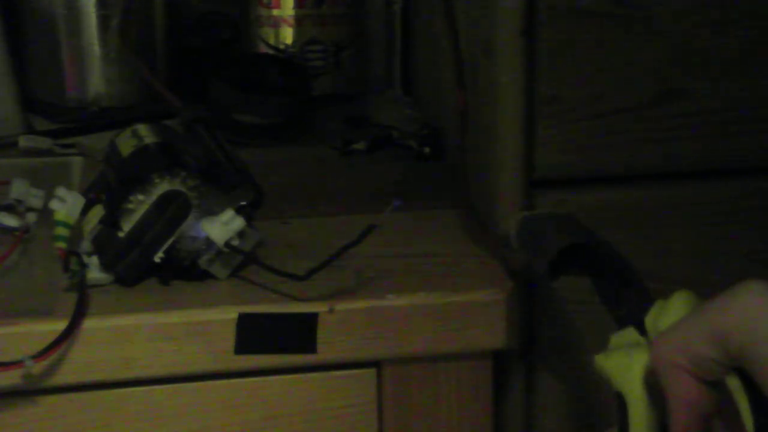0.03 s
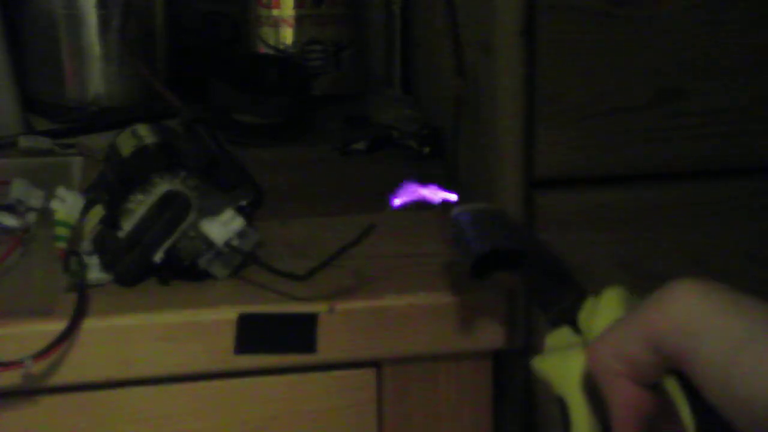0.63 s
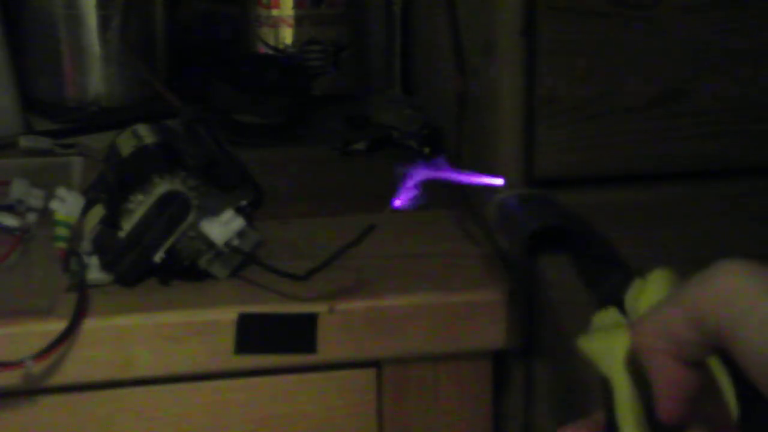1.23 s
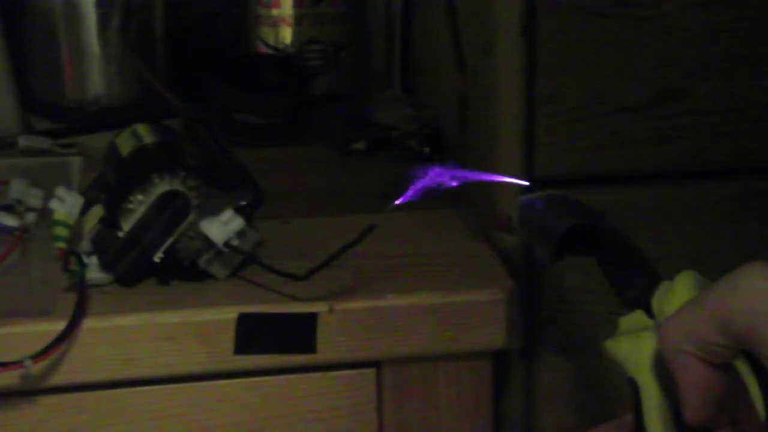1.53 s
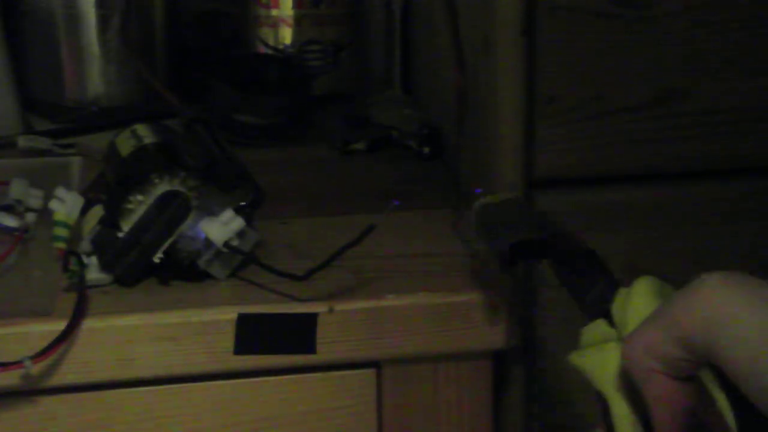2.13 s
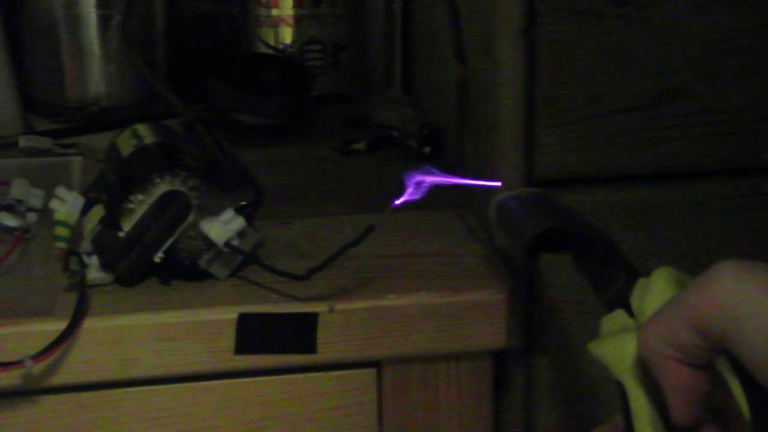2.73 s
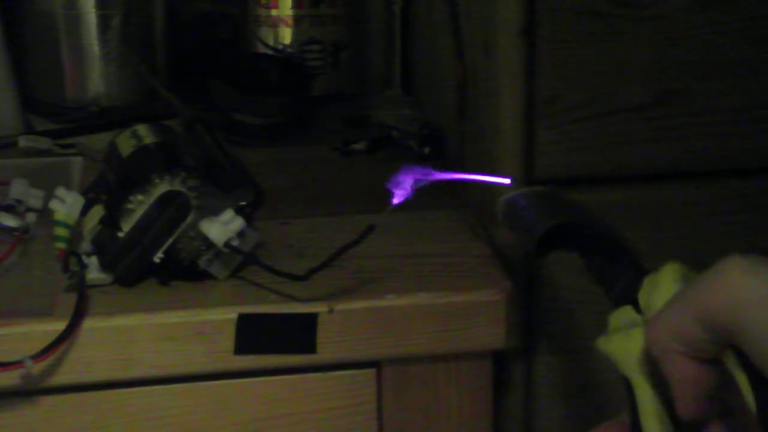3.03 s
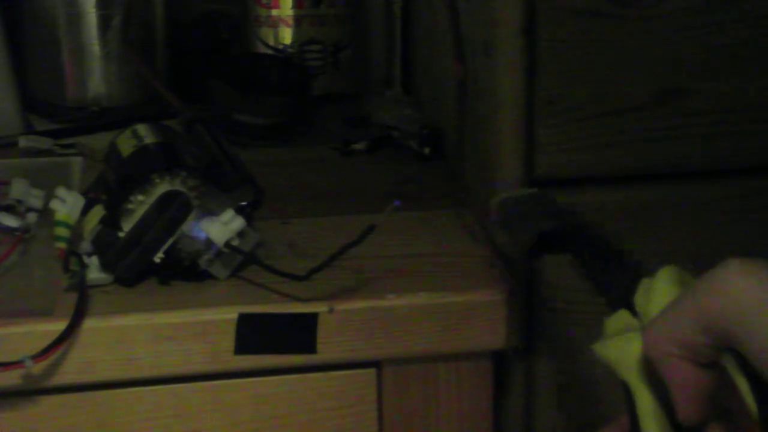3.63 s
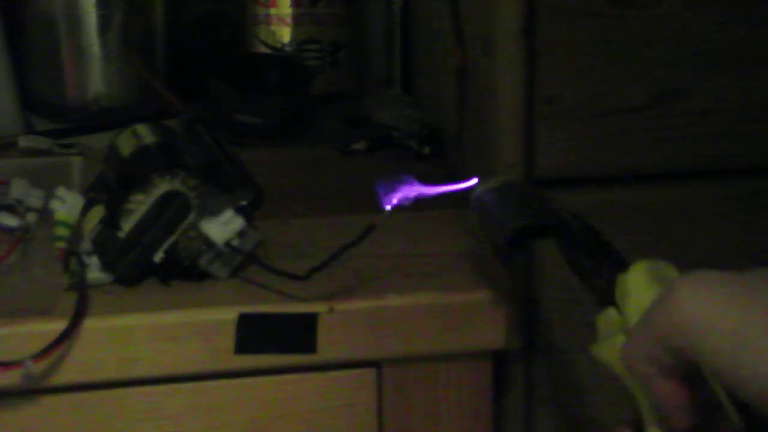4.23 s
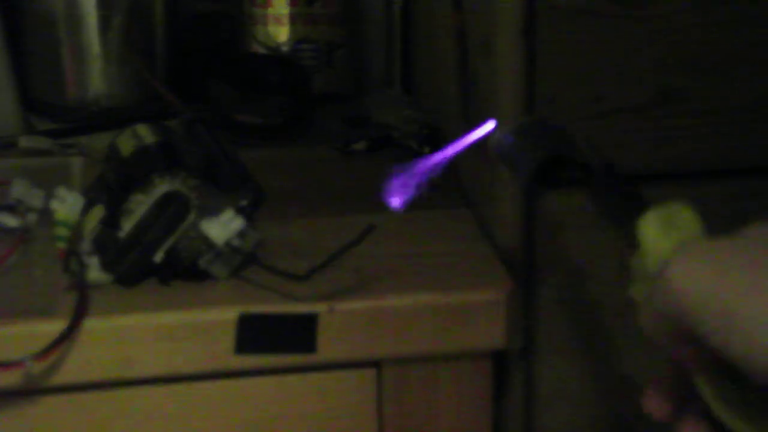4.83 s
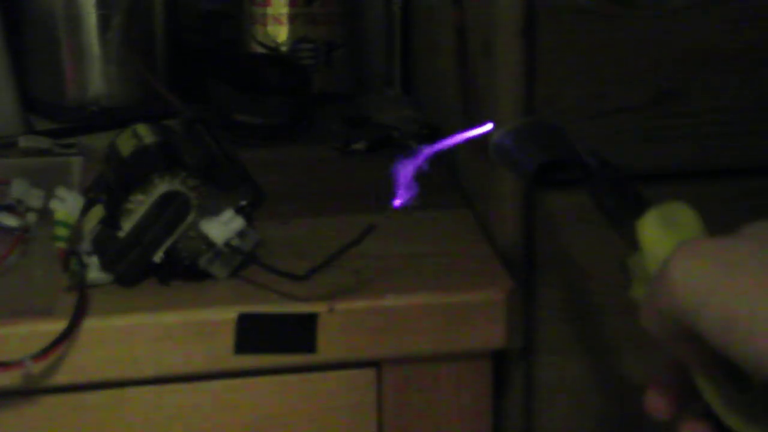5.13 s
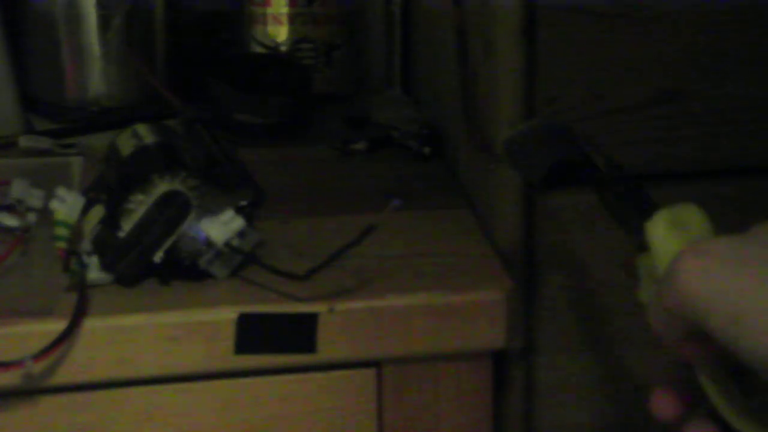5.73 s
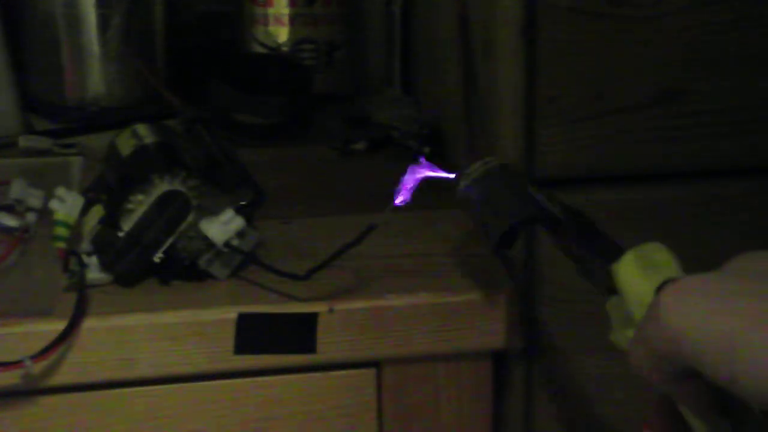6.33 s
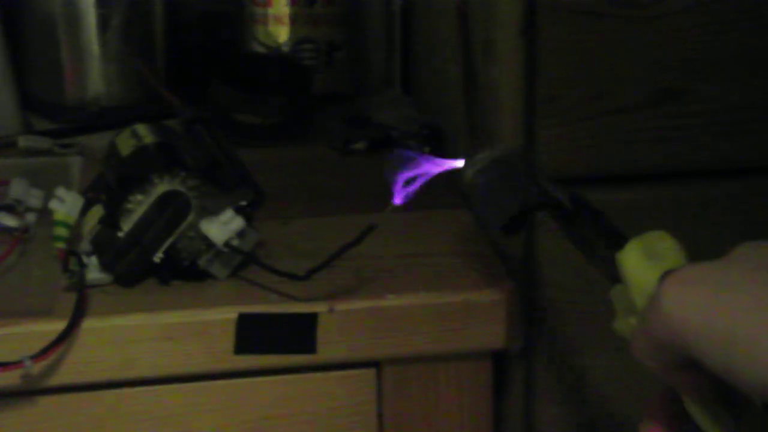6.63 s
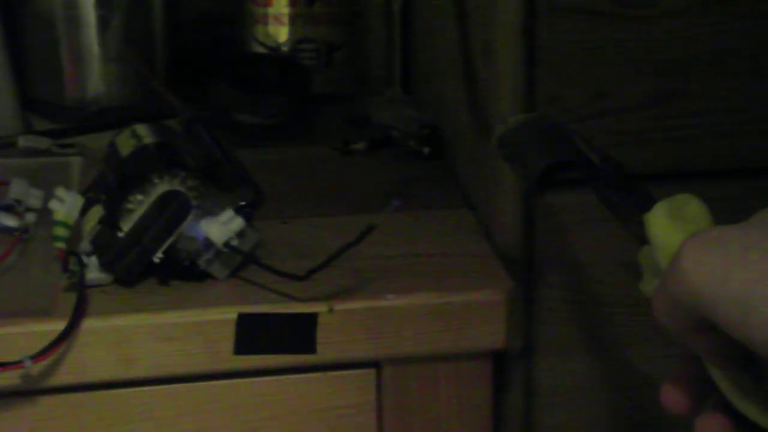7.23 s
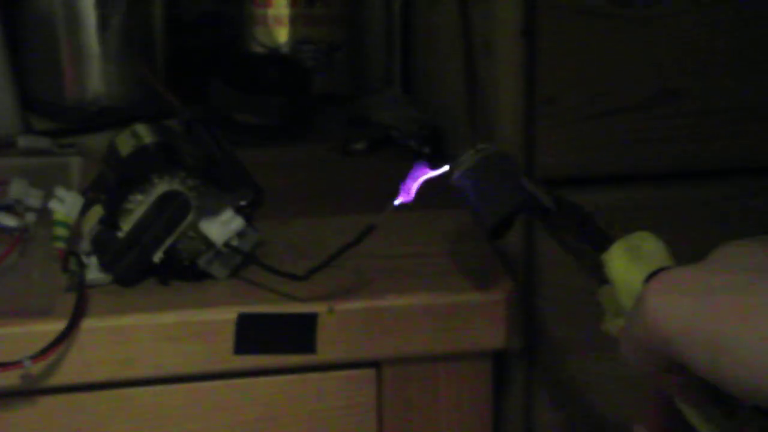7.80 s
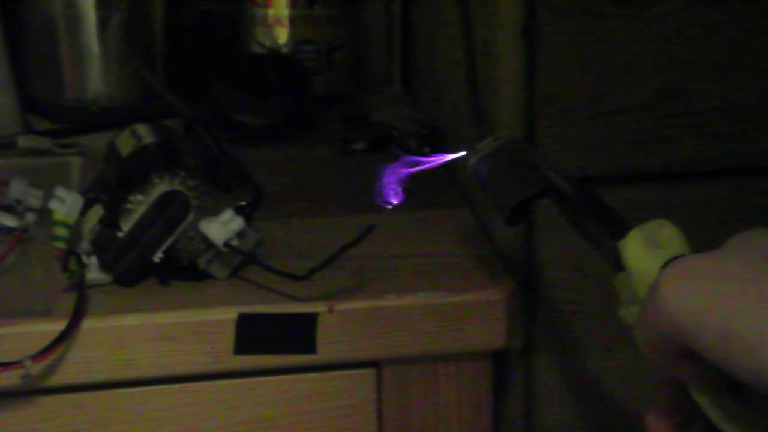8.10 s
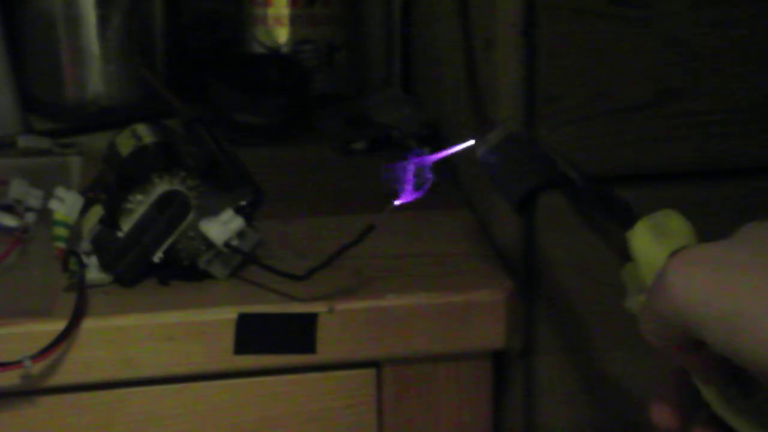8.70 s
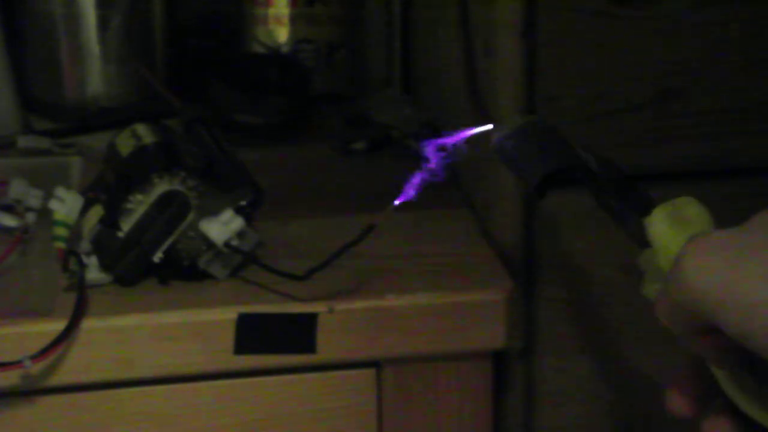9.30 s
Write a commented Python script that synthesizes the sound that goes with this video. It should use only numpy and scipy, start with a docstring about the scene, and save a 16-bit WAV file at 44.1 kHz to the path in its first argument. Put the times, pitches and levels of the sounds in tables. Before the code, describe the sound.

A transformer rattles with sharp snaps between electric arcs that pop, sizzle, whistle and sputter, while a cooling fan runs in a small workshop.

```python
"""A high-voltage transformer flashes over in rattles of sharp snaps while no arc burns.
Five times an arc is drawn from its lead: it catches with a pop, sizzles softly, then hisses,
whistles and sputters as it is stretched, and breaks. The driver whines, a cooling fan rushes,
and a low rumble with dull bumps runs underneath. A small wooden room answers the sparks."""
import sys
import numpy as np
from scipy import signal
from scipy.fft import rfft, irfft, next_fast_len
from scipy.io import wavfile

SR = 44100
rng = np.random.default_rng(int(sys.argv[2]) if len(sys.argv) > 2 else 0)


def dump(signal):
    """Clip the signal to [-1, 1] and save it as 16-bit WAV at the path in sys.argv[1]."""
    limited = np.clip(np.atleast_2d(signal).T, -1, 1)
    pcm = np.round(limited * 32767).astype(np.int16)
    wavfile.write(sys.argv[1], SR, pcm)


N = 412776
TIME_S = np.arange(N) / SR


# flashover spectrum: freq_hz, level_db
SNAP_SPECTRUM = [(300, -48), (1500, -35.5), (2500, -15.5), (2850, -9), (3080, 1), (3450, -8.5), (4000, -17),
                 (4700, -22.5), (5400, -14.5), (6600, -5), (7400, -5.5), (8300, 3), (9600, -3.5),
                 (11200, -24), (13500, -25), (15300, -17)]

def flashovers():
    """Each flashover is a pressure spike with a brief metallic ring, then a rough scatter."""
    start_s = flashover_times()
    gains = amp(-.2 + .5 * rng.standard_normal(len(start_s)))
    spikes = strikes(start_s, gains, click(SNAP_SPECTRUM))
    scatter = strikes(start_s, gains, decay(t60_s=.016, samples=SR // 25)) * noise(SNAP_SPECTRUM)
    return spikes + amp(-22) * scatter


# runs of flashovers: first_s, last_s, rate_hz
RATTLE_RUNS = [(0.008, 0.025, 59), (0.075, 0.14, 49), (0.18, 0.24, 38), (0.281, 0.337, 53),
               (0.379, 0.379, 59), (1.609, 2.129, 60), (3.395, 3.64, 65), (3.67, 3.888, 50),
               (5.523, 5.93, 57), (5.941, 6.15, 54), (7.085, 7.58, 58)]

def flashover_times(recharge_scatter=.17):
    """The voltage builds up and flashes over repeatedly, after slightly uneven waits."""
    jitters = rng.standard_normal((len(RATTLE_RUNS), 64))
    runs = []
    for (first_s, last_s, rate_hz), jitter in zip(RATTLE_RUNS, jitters):
        span_s = last_s - first_s
        count = max(round(span_s * rate_hz), 1)
        waits = np.exp(recharge_scatter * jitter[:count])
        runs.append(first_s + span_s * np.append(0, np.cumsum(waits)) / waits.sum())
    return np.concatenate(runs)


# short-arc burns: start_s, end_s, pop_db, sizzle_db
ARC_BURNS = [(0.413, 1.205, -35, -46), (2.128, 2.65, -31, -50), (3.901, 4.565, -29, -50.5),
             (6.19, 6.82, -30.5, -44.5), (7.596, 8.904, -31, -45)]
# short-arc spectrum: freq_hz, level_db
SIZZLE_SPECTRUM = [(1000, -10), (5000, -23), (6700, 7), (8200, 14), (9500, -9), (11500, -14), (15500, -11)]

def soft_arc(swell_db=7, swell_s=.092):
    """A short arc sizzles, ticks and crackles, swelling just before it starts to hiss."""
    level = np.zeros(N)
    for start_s, end_s, _, sizzle_db in ARC_BURNS:
        swell = np.exp(-np.abs(end_s - TIME_S) / swell_s)
        level += gate(start_s, end_s, edge_s=.0092) * amp(sizzle_db + swell_db * swell)
    sizzle = unit(flutter(depth_db=3.9, rate_hz=60) * noise(SIZZLE_SPECTRUM, grain_db=8))
    ticks = sputter(SPIT_SPECTRUM, rate_hz=69, rise_s=.00064, spread_db=11)
    crackles = sputter(FLARE_SPECTRUM, rate_hz=11, rise_s=.00084, spread_db=13)
    wander = amp(1.5 * wobble(7.9))
    return level * wander * (amp(-1) * sizzle + amp(-1.5) * (ticks + crackles))


# ignition spectrum: freq_hz, level_db
POP_SPECTRUM = [(200, -3), (600, 1), (1200, 4), (2600, 1), (4500, -2), (9000, -12)]

def pops():
    """The arc catches with a short, full-bodied pop."""
    start_s, _, pop_db, _ = np.transpose(ARC_BURNS)
    return strikes(start_s, amp(pop_db), decay(t60_s=.076, samples=SR // 10)) * noise(POP_SPECTRUM)


# long-arc spells: start_s, end_s, hiss_db, whistle_db, whistle_rise_db, tone_share
ARC_STRETCHES = [(1.064, 1.08, -47, -34.5, -15, .2), (1.21, 1.495, -32.5, -25, 8, .8),
                 (2.65, 2.886, -32, -38, -2, 0.55), (2.884, 3.39, -31.5, -26.5, -2, .8),
                 (4.566, 5.47, -33.5, -29.5, -1, 0.51), (6.833, 7.093, -30.5, -31.5, -4, 0.2),
                 (8.914, 9.4, -32, -32, 2, 0.25)]
# long-arc spectrum: freq_hz, level_db
HISS_SPECTRUM = [(500, -42), (2000, -8.5), (2800, 1.5), (4000, -10), (5300, -29), (6700, -7), (8200, -4),
                 (10000, -1.5), (11500, -8), (14000, 3), (15500, 0)]
STRETCH_EDGE_S = .0054

def stretched_arc():
    """The long arc flutters, hisses and sputters."""
    level = sum(amp(hiss_db) * gate(start_s, end_s, STRETCH_EDGE_S)
                for start_s, end_s, hiss_db, *_ in ARC_STRETCHES)
    hiss = unit(flutter(depth_db=4.4, rate_hz=170) * noise(HISS_SPECTRUM, grain_db=3.5))
    spurts = sputter(SPIT_SPECTRUM, rate_hz=70, rise_s=.0016, spread_db=16)
    return level * (amp(1) * hiss + spurts)


def whistle(pitch_hz=13248, band_hz=13160, half_width_hz=330, ends_db=-4):
    """The long arc whistles, between a fuzzy band and a clean tone; unsteady, it stutters."""
    level, tone_share = np.zeros(N), np.zeros(N)
    for start_s, end_s, _, level_db, rise_db, share in ARC_STRETCHES:
        on = gate(start_s, end_s, STRETCH_EDGE_S)
        progress = np.interp(TIME_S, [start_s, end_s], [-1, 1])
        level += on * amp(level_db + rise_db * progress / 2 + ends_db * progress ** 2)
        tone_share += on * share
    tone_share = np.clip(tone_share, 0, 1)
    jitter_hz = (12 + 60 * (1 - tone_share)) * wobble(150)
    tone = np.sqrt(2) * np.sin(2 * np.pi * np.cumsum(pitch_hz + jitter_hz) / SR)
    fuzz = unit(filtered(rng.standard_normal(N), lambda hz: resonance(hz, band_hz, half_width_hz)))
    stutter = amp((1.2 + 3.8 * (1.5 - tone_share)) * wobble(110))
    voice = np.sqrt(tone_share) * tone * stutter + np.sqrt(1 - tone_share) * fuzz
    waver_db = 2 * wobble(14)
    return amp(4 + waver_db) * level * voice


# loudest spits: time_s, level_db, crack_offset_db
ARC_SPITS = [(2.8414, -11, -15), (3.0505, -12, -15), (3.0974, -11.5, -18), (3.2834, -13, -20),
             (3.2959, -7, -9.5), (4.7007, -0.5, -23), (4.7227, -5, -21), (4.7547, -1, -14.5),
             (4.7657, -7.5, -5.5), (4.804, -6.5, -17), (4.8443, -6.5, -20), (4.9343, -4, -8),
             (4.9457, -3, -11), (4.96, -9, -8), (5.019, -5.5, -9.5), (5.0348, -3.5, -10.5),
             (5.3797, -8, -12), (5.46, -11, -13), (6.984, -4.5, -22), (7.003, -8, -23), (7.0472, -5, -16),
             (9.3483, -4.5, -15)]
# bright crackle spectrum: freq_hz, level_db
SPIT_SPECTRUM = [(1000, -28), (5300, -28), (6800, -6.5), (8200, 3), (9200, 1), (10200, -1), (11500, -14.5),
                 (15500, -10.5)]
# lower crack spectrum: freq_hz, level_db
CRACK_SPECTRUM = [(500, -25), (1700, -14.5), (2400, 2.5), (3000, 0), (3700, -4), (4400, -16.5),
                  (5400, -18.5), (6600, -4), (9000, -29)]

def spits(rise_s=.0027, lead_s=.0016, catch_db=-17.5, catch_crack_db=-3):
    """The arc catches or its root jumps: milliseconds of dense crackle over a lower crack."""
    catches = [(start_s, catch_db, catch_crack_db) for start_s, *_ in ARC_BURNS]
    time_s, level_db, crack_offset_db = np.transpose(list(ARC_SPITS) + catches)
    start_s = time_s - lead_s
    puff = pulse(rise_s) ** 2
    bright = strikes(start_s, amp(level_db - 8), puff) * noise(SPIT_SPECTRUM, grain_db=3.5)
    crack_level = strikes(start_s, amp(level_db + crack_offset_db - 2), puff)
    return bright + crack_level * noise(CRACK_SPECTRUM, grain_db=2)


# flares as the arc tears off: start_s, length_s, level_db
ARC_FLARES = [(1.427, .009, -14), (1.454, .007, -12), (1.48, 0.043, -13), (1.526, 0.067, -13.3),
              (3.332, 0.014, -13.5), (3.369, .018, -12.5), (4.764, .008, -18), (7.052, .004, -16),
              (7.068, 0.014, -15)]
# flare spectrum: freq_hz, level_db
FLARE_SPECTRUM = [(300, -41), (1000, -20), (1900, -9), (2700, 3), (3400, -1.5), (4100, -12), (5000, -17.5),
                  (5700, -10.5), (6900, 5.5), (8200, 2), (10000, -4), (11500, -15), (15500, -10)]

def flares():
    """Close to breaking, the arc restrikes so fast that its cracks merge into a roar."""
    level = sum(amp(level_db) * gate(start_s, start_s + length_s, edge_s=.0017)
                for start_s, length_s, level_db in ARC_FLARES)
    restrikes = flutter(depth_db=2.3, rate_hz=450)
    return level * unit(restrikes * noise(FLARE_SPECTRUM, grain_db=4.5))


def sputter(spectrum, rate_hz, rise_s, spread_db):
    """Brief spurts of the arc at random moments; rms 1."""
    start_s = np.cumsum(rng.uniform(.15, 1.85, round(2 * rate_hz * N / SR))) / rate_hz
    start_s = start_s[start_s < N / SR]
    gains = amp(-spread_db * rng.random(len(start_s)))
    return unit(strikes(start_s, gains, pulse(rise_s)) * noise(spectrum, grain_db=6))


# driver tones: pitch_hz, rms_db
DRIVER_TONES = [(7440, -39), (14880, -38)]

def driver_whine():
    """The driver sings at one near-steady pitch and its octave."""
    phase_per_hz = 2 * np.pi * np.cumsum(1 + .00008 * wobble(5.7)) / SR
    waver = amp(.8 * wobble(6))
    return waver * sum(np.sqrt(2) * amp(db) * np.sin(hz * phase_per_hz) for hz, db in DRIVER_TONES)


# fan and housing resonances: centre_hz, half_width_hz, level_db
FAN_RESONANCES = [(1355, 145, -12.5), (1623, 65, -5), (2105, 104, 0), (2533, 162, -3), (2720, 336, -6),
                  (2976, 76, -8), (3284, 53, -11)]
# room air and broad fan rush: freq_hz, level_db
AIR_SPECTRUM = [(30, -11), (150, -10.5), (320, -3), (550, -9), (800, -2), (1200, -2.5), (3000, -8),
                (3800, -1), (4800, -8.5), (7000, -5), (9000, -10), (13500, -12), (15300, -2.5)]

def fan():
    """Air rushes through the fan's housing, over the broad hush of the room."""
    def housing(hz):
        return np.sqrt(sum((amp(level_db) * resonance(hz, centre_hz, half_width_hz)) ** 2
                           for centre_hz, half_width_hz, level_db in FAN_RESONANCES))
    rush = unit(filtered(rng.standard_normal(N), housing))
    return amp(-30.5) * rush + amp(-38) * noise(AIR_SPECTRUM)


# low background levels: time_s, rumble_db, rub_db
RUMBLE_LEVELS = [(0.0, -41, -48.5), (1.41, -45.5, -43), (1.82, -39.5, -45.5), (2.06, -42.5, -44.5),
                 (2.4, -39, -43.5), (2.74, -40.5, -47), (3.44, -42.5, -46.5), (4.48, -37, -42.5),
                 (5.58, -44.5, -48), (6.96, -48, -45.5), (7.43, -43, -48), (7.72, -47.5, -47.5),
                 (8.94, -44.5, -46.5), (9.36, -38.5, -47.5)]
# rumble spectrum: freq_hz, level_db
RUMBLE_SPECTRUM = [(8, -28), (22, 3), (55, -1.5), (88, 0.5), (115, -16), (300, -29.5)]
# rub and scuff spectrum: freq_hz, level_db
RUB_SPECTRUM = [(50, -29), (90, -3.5), (130, -6), (190, -6.5), (330, -8), (600, -14), (1200, -25.5)]
# dull bumps: start_s, level_db, tilt_db_per_octave
DULL_BUMPS = [(1.31, -33, 10), (2.251, -25.5, 3), (2.325, -21.5, 0), (2.56, -17, -3), (2.99, -24, -2),
              (3.08, -23, 2), (3.97, -28, -12), (4.285, -19.5, 5), (4.391, -21, 6), (4.5, -26, 0),
              (7.4, -35, -12), (9.26, -32, -6)]
# bump resonances: pitch_hz, level_db, t60_s
BUMP_MODES = [(46.5, -1.5, 0.11), (90.8, -0.5, .13), (158.5, -13, .09)]

def rumble_and_bumps():
    """A trembling rumble, soft rubbing and dull bumps; brighter bumps scuff more."""
    knot_s, *levels_db = np.transpose(RUMBLE_LEVELS)
    rumble_db, rub_db = (np.interp(TIME_S, knot_s, column) for column in levels_db)
    tremble_db = 1.5 * wobble(5)
    start_s, level_db, tilt = np.transpose(DULL_BUMPS)
    bumps = np.zeros(N)
    for pitch_hz, mode_db, t60_s in BUMP_MODES:
        octaves = np.log2(pitch_hz / BUMP_MODES[1][0])
        gains = amp(level_db + mode_db + tilt * octaves + 2)
        bumps += strikes(start_s, gains, ring(pitch_hz, t60_s, attack_s=.01))
    scuff_fade = decay(t60_s=.3, samples=SR // 2)
    scuffs = strikes(start_s, amp(level_db + tilt - 17), scuff_fade) * noise(RUB_SPECTRUM)
    rumble = amp(rumble_db + tremble_db + 1) * noise(RUMBLE_SPECTRUM)
    rubbing = amp(rub_db + tremble_db / 2 + 2) * noise(RUB_SPECTRUM)
    return scuffs + rumble + rubbing + bumps


# bench and wall reflections: delay_s, level_db
REFLECTIONS = [(.003, -20), (.0045, -20), (.0106, -46), (.012, -37), (.03, -41)]
# room decay: freq_hz, t60_s
ROOM_DECAY = [(300, 0.11), (3000, 0.28), (8000, 0.25), (15000, 0.036)]

def workshop(x, wet_db):
    """Direct sound, near reflections and a diffuse tail whose decay depends on frequency."""
    hz, time_s, bins = signal.stft(rng.standard_normal(SR // 2), SR, nperseg=256)
    fade = amp(-60 * time_s / along(ROOM_DECAY, hz)[:, None])
    _, tail = signal.istft(bins * fade, SR, nperseg=256)
    response = amp(wet_db) * tail / np.linalg.norm(tail)
    response[0] += 1
    for delay_s, level_db in REFLECTIONS:
        response[round(delay_s * SR)] += amp(level_db)
    return signal.fftconvolve(x, response)[:N]


def amp(db):
    """Decibels to gain."""
    return 10 ** (np.asarray(db) / 20)


def unit(x):
    """x at rms 1."""
    return x / np.sqrt(np.mean(x ** 2) + 1e-20)


def along(points, hz):
    """(freq_hz, value) points read on a log axis."""
    knot_hz, values = np.transpose(points)
    return np.interp(np.log(hz + 1), np.log(knot_hz + 1), values)


def gate(start_s, end_s, edge_s):
    """1 from start to end, with linear edges."""
    return np.clip(np.minimum(TIME_S - start_s, end_s - TIME_S) / edge_s + .5, 0, 1)


def decay(t60_s, samples):
    """Exponential fade from 1."""
    return amp(-60 * np.arange(samples) / SR / t60_s)


def pulse(rise_s):
    """Envelope that rises to 1 and dies away."""
    age = np.arange(SR // 50) / SR / rise_s
    return age * np.exp(1 - age)


def ring(pitch_hz, t60_s, attack_s):
    """One damped mode with a soft start."""
    time_s = np.arange(SR // 2) / SR
    onset = 1 - np.exp(-time_s / attack_s)
    return np.sin(2 * np.pi * pitch_hz * time_s) * decay(t60_s, len(time_s)) * onset


def resonance(hz, centre_hz, half_width_hz):
    """Bell-shaped gain of peak 1."""
    return 1 / (1 + ((hz - centre_hz) / half_width_hz) ** 2)


def wobble(rate_hz):
    """Smooth random curve of rms 1, with knots at rate_hz."""
    knots = rng.standard_normal(int(N * rate_hz / SR) + 4)
    smooth = signal.resample_poly(knots, 8, 1)
    return unit(np.interp(TIME_S * rate_hz * 8, np.arange(len(smooth)), smooth))


def flutter(depth_db, rate_hz):
    """Random gain within +/- depth_db."""
    return amp(depth_db * np.tanh(wobble(rate_hz)))


def filtered(x, response):
    """x through a frequency response."""
    size = next_fast_len(N + SR // 4)
    hz = np.fft.rfftfreq(size, 1 / SR)
    return irfft(rfft(x, size) * response(hz), size)[..., :N]


def noise(spectrum, grain_db=0):
    """Coloured noise of rms 1; grain_db breaks it into sub-millisecond crackles."""
    white = rng.standard_normal(N)
    if grain_db:
        white *= amp(grain_db * wobble(1500))
    return unit(filtered(white, lambda hz: amp(along(spectrum, hz))))


def click(spectrum, size=1024):
    """Minimum-phase click of peak 1."""
    magnitude = amp(along(spectrum, np.fft.rfftfreq(size, 1 / SR)))
    cepstrum = irfft(np.log(magnitude))
    cepstrum[1:size // 2] *= 2
    cepstrum[size // 2 + 1:] = 0
    shape = irfft(np.exp(rfft(cepstrum)))
    return shape / np.abs(shape).max()


def strikes(start_s, gains, shape):
    """One scaled copy of shape at each start."""
    out = np.zeros(N + 2 * len(shape))
    starts = np.clip(np.round(start_s * SR).astype(int), 0, N)
    for start, gain in zip(starts, gains):
        out[start:start + len(shape)] += gain * shape
    return out[:N]


# left channel's phase lag behind the right: freq_hz, lag_rad
STEREO_LAG = [(150, .006), (1000, 0.015), (1800, 0.0071), (2400, 0.24), (3300, 0.43), (4200, 0.13),
              (6000, 0.79), (8500, 1.19), (11000, 1.55), (15500, 2.23)]

def scene():
    """Nearly mono mix; in the treble the left channel trails the right a little."""
    arc = pops() + soft_arc() + stretched_arc() + spits() + flares()
    sparks = workshop(flashovers(), wet_db=-8.5) + amp(1) * workshop(arc, wet_db=-5.5)
    mono = sparks + whistle() + fan() + driver_whine() + rumble_and_bumps()
    return filtered(mono, lambda hz: np.exp(.5j * np.outer([-1, 1], along(STEREO_LAG, hz))))


def record(dry):
    """Clip the tallest spikes, then cut the top treble."""
    ceiling, cutoff_hz = .98, 15900
    return filtered(np.clip(dry, -ceiling, ceiling), lambda hz: hz < cutoff_hz)


dry = scene()
out = record(dry)
dump(out)
```